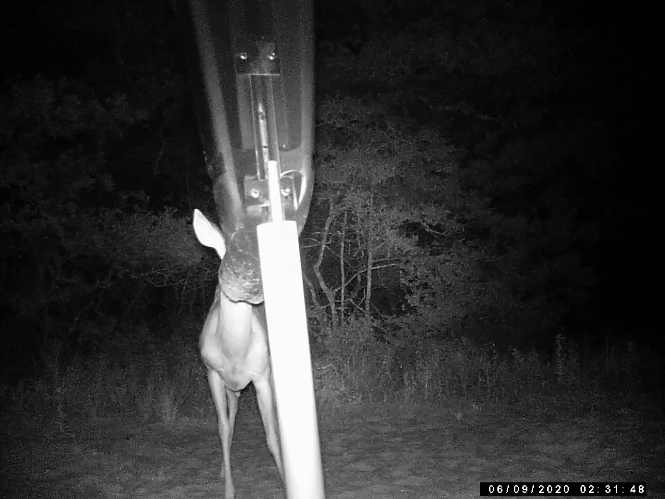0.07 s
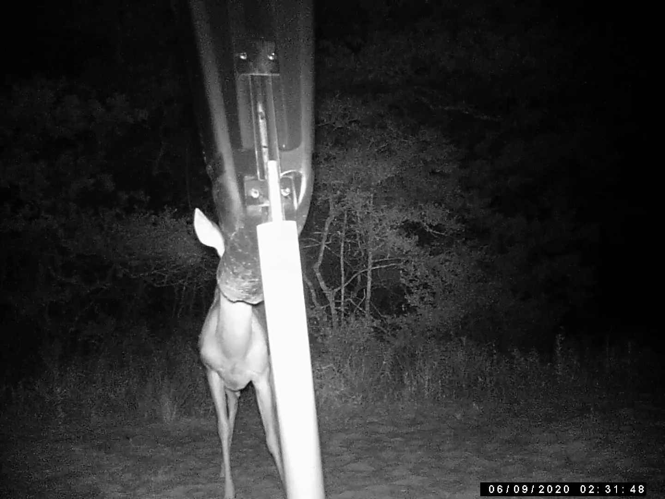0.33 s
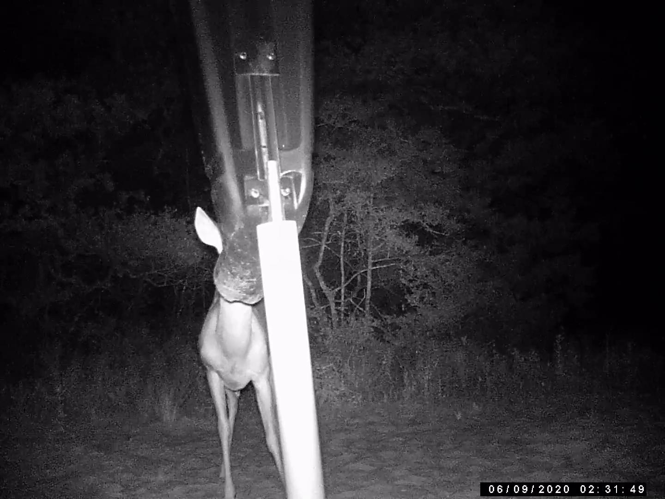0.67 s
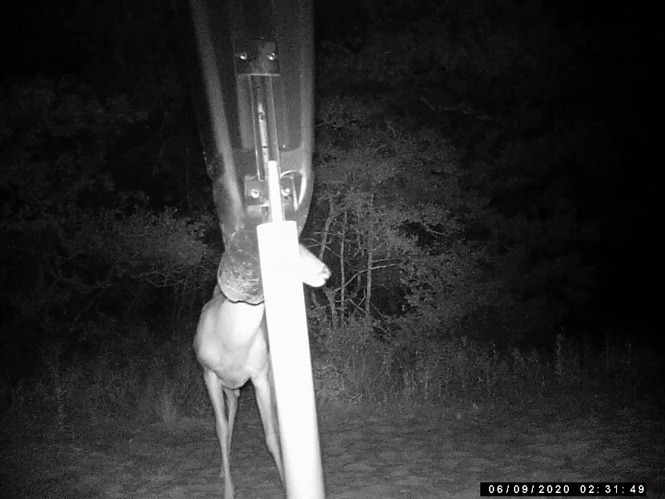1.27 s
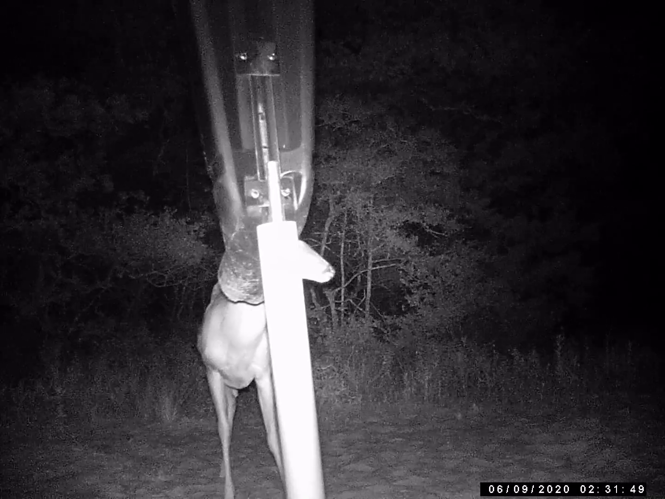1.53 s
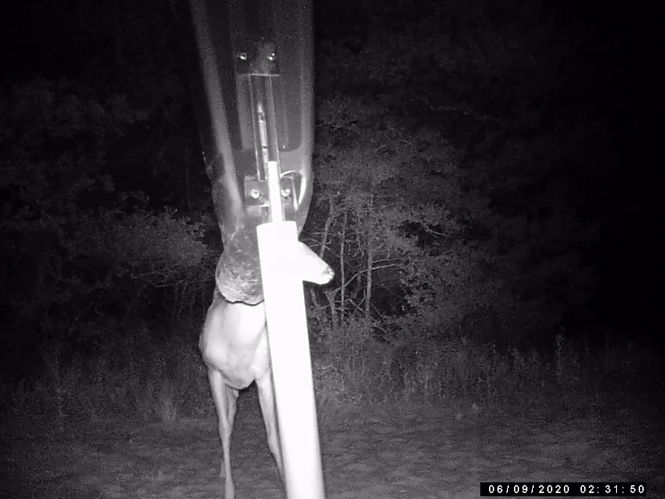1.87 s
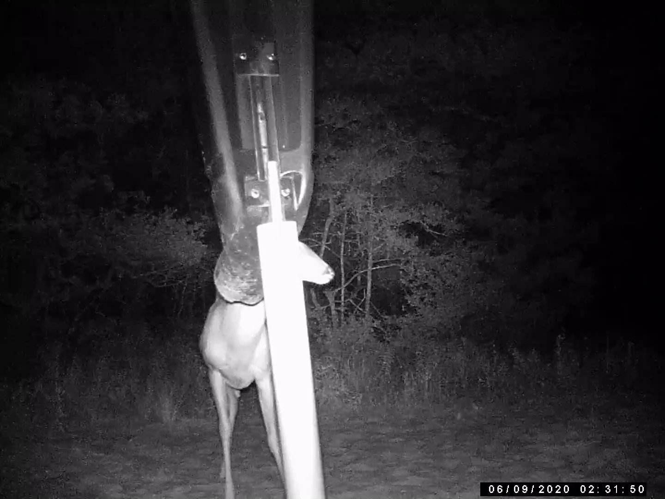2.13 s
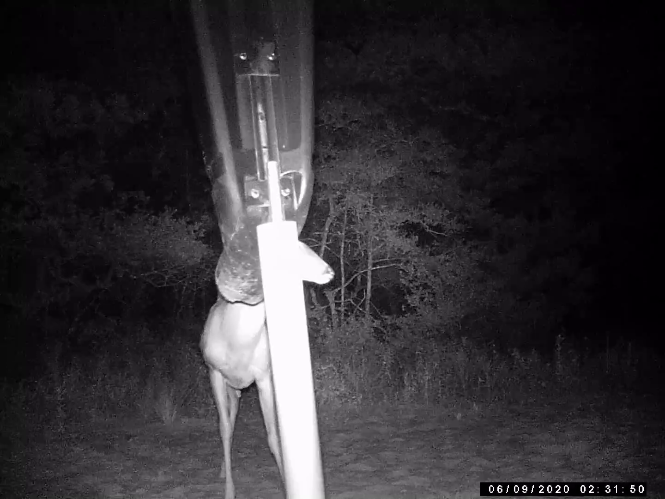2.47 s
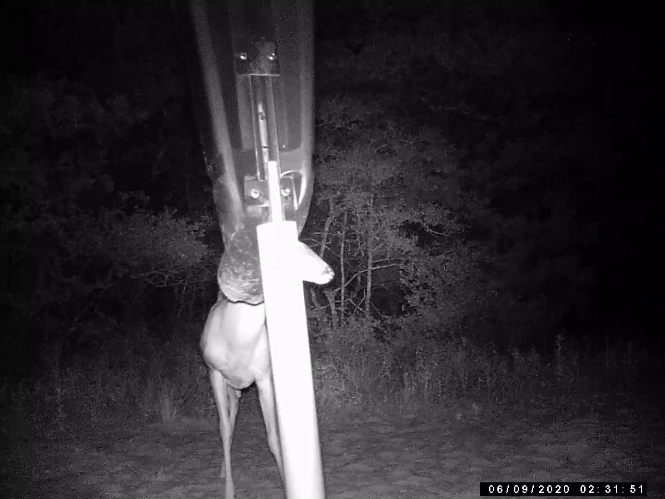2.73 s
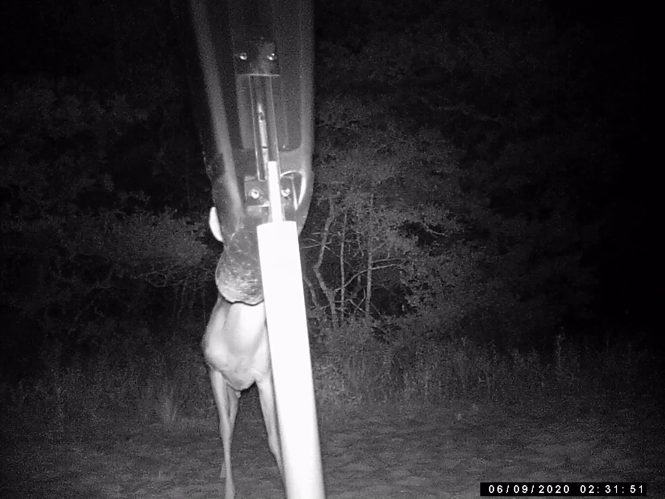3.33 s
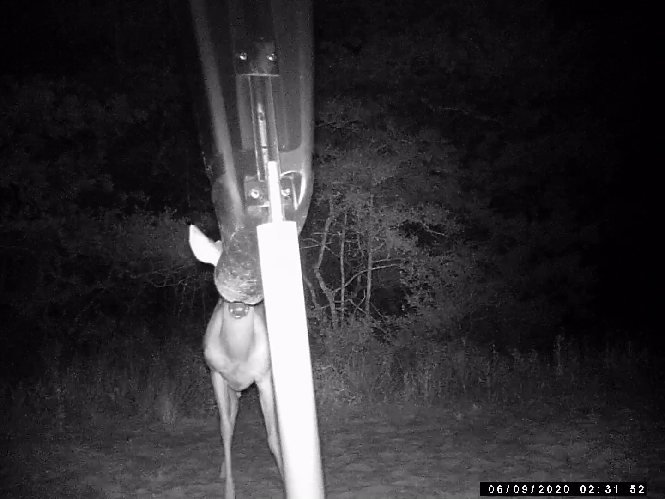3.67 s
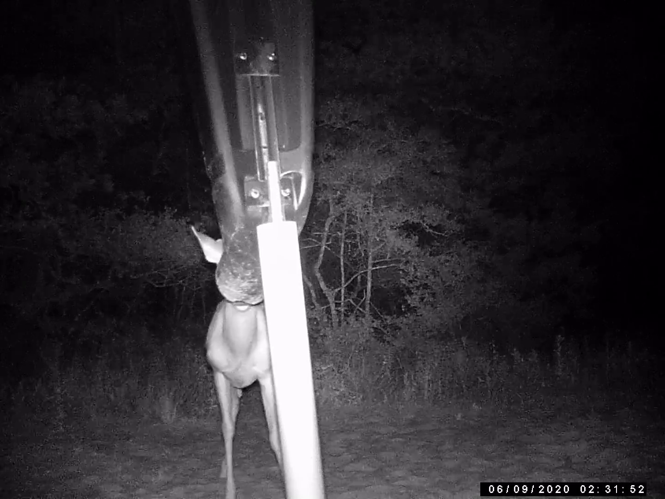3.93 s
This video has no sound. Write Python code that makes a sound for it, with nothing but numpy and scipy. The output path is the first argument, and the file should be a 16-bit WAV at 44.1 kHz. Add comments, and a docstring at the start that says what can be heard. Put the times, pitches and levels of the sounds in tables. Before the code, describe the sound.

Katydids rasp in quick pulses, alternately soft and crisp, beside dark trees full of crickets. A faraway nightjar whistles at the start and again midway, while the outdoor camera's microphone catches hum and irregular low electrical thumps throughout.

```python
"""A distant nightjar whistles its slurred phrase twice, echoed by the trees of a ranch at night.
A near and a far katydid rasp in turn, dragging a file over the wing, above a steady chorus of
crickets, one small cricket's thin chirps and still air. It is all heard by a trail camera, whose
own electronics hum, and thump and buzz each time they draw a burst of current."""
import sys
import numpy as np
from scipy import signal
from scipy.fft import rfft, irfft
from scipy.io import wavfile
from scipy.ndimage import uniform_filter1d

SR = 44100
rng = np.random.default_rng(int(sys.argv[2]) if len(sys.argv) > 2 else 0)


def unload_wav(signal):
    """Save mono or channel-first audio to the path in sys.argv[1] as 16-bit WAV at rate SR, clipped to [-1, 1]."""
    wavfile.write(
        sys.argv[1],
        SR,
        np.round(np.clip(np.atleast_2d(signal).T, -1, 1) * 32767).astype(np.int16),
    )


N = 176400


def amp(db):
    """Decibels to gain."""
    return 10 ** (np.asarray(db) / 20)


def unit_rms(x):
    """Scales to rms 1."""
    return x / np.sqrt(np.mean(x ** 2) + 1e-20)


def add(mix, start_s, sound):
    """Mixes a sound in at start_s, trimming whatever falls outside the mix."""
    at = round(start_s * SR)
    sound = sound[max(-at, 0):]
    part = mix[max(at, 0):][:len(sound)]
    part += sound[:len(part)]


def coloured(x, curve):
    """Applies an EQ curve (freq_hz, relative_db), keeping the power of white noise."""
    freq_hz, relative_db = np.transpose(curve)
    hz = np.fft.rfftfreq(N, 1 / SR)
    gain = amp(np.interp(np.log(hz + 1), np.log(freq_hz), relative_db))
    return irfft(rfft(x) * unit_rms(gain), N)


def drift(rate_hz):
    """A smooth random wander of rms 1, rolling off above rate_hz."""
    hz = np.fft.rfftfreq(N, 1 / SR)
    return unit_rms(irfft(rfft(rng.standard_normal(N)) * np.exp(-(hz / rate_hz) ** 2), N))


def harmonics(base_hz, partials):
    """Steady sines on multiples of base_hz, each with a random phase."""
    t = np.arange(N) / SR
    return sum(amp(db) * np.sin(2 * np.pi * (k * base_hz * t + rng.random())) for k, db in partials)


def woods(x, wet_db, t60_s, delay_s):
    """Adds scattered echoes from trunks and foliage."""
    t = np.arange(SR) / SR
    echoes = rng.standard_normal(SR) * (rng.random(SR) < 2000 / SR)
    tail = echoes * amp(-60 * t / t60_s) * (t > delay_s)
    return x + amp(wet_db) * signal.fftconvolve(x, tail / np.linalg.norm(tail))[:N]


def night_air():
    """Still air and microphone hiss: a soft noise bed, heaviest in the lows."""
    # colour of the bed: freq_hz, relative_db
    air_eq = [(10, 3.5), (30, -4.5), (60, -5), (110, -8.5), (170, -26), (230, -29.5), (320, -40.5),
              (500, -41), (1100, -46.5), (2000, -41.5), (4000, -37.5), (7500, -52), (9500, -56.5),
              (15500, -59)]
    return amp(-39) * coloured(rng.standard_normal(N), air_eq)


def camera_hum():
    """A low, faintly wavering hum on multiples of the camera's frame rate."""
    # hum partials: multiple, level_db
    partials = [(1, -50), (2, -40), (3, -35.5), (4, -54.5), (5, -60), (6, -56.5), (7, -70), (9, -76),
                (10, -80), (12, -82.5)]
    frame_hz = 30.14
    return np.sqrt(2) * harmonics(frame_hz, partials) * (1 + 0.059 * drift(6))


def cricket_chorus(count=16):
    """Each kind of cricket is a crowd: every one repeats a short, sagging wing pulse on its own pitch."""
    # kinds of cricket: pitch_hz, spread_hz, level_db
    kinds = [(3021, 75, -47.5), (3580, 101.4, -57.5), (4253, 166, -63), (6100, 120, -70.5),
             (7190, 120, -70.5)]
    pulse_s, pulses_per_s, sag_hz_per_s = .014, 34, 10300
    t, out = np.arange(0, pulse_s, 1 / SR), np.zeros(N)
    rank = (np.arange(count) + .5) / count
    detunes = 0.56 * np.log(rank / (1 - rank))  # most sit near the centre pitch
    for pitch_hz, spread_hz, level_db in kinds:
        crowd = np.zeros(N)
        for detune in detunes:
            cycles = np.cumsum(pitch_hz + spread_hz * detune - sag_hz_per_s * (t - pulse_s / 2)) / SR
            pulse = np.sin(np.pi * t / pulse_s) * np.sin(2 * np.pi * cycles)
            gaps = rng.uniform(.7, 1.3, size=200)
            for start_s in (np.cumsum(gaps) - 2 - rng.random()) / pulses_per_s:
                add(crowd, start_s, pulse)
        out += amp(level_db) * unit_rms(crowd)
    return out


def small_cricket():
    """Short, thin, high chirps that sag in pitch."""
    # chirps: middle_s, level_db
    chirps = [(.732, -62), (.753, -59), (.774, -63), (2.885, -54), (2.907, -62), (2.93, -63)]
    pitch_hz, sag_hz_per_s, chirp_s = 7250, 4700, 0.014
    t, out = np.arange(0, chirp_s, 1 / SR), np.zeros(N)
    cycles = np.cumsum(pitch_hz - sag_hz_per_s * (t - chirp_s / 2)) / SR
    chirp = np.sin(np.pi * t / chirp_s) * np.sin(2 * np.pi * cycles)
    for middle_s, level_db in chirps:
        add(out, middle_s - chirp_s / 2, amp(level_db) * chirp)
    return woods(out, wet_db=-22, t60_s=.15, delay_s=0.006)


def thump(rise_s, shape):
    """A smooth one-sided bump that peaks at rise_s; a higher shape narrows it."""
    u = np.arange(SR // 5) / SR / rise_s
    return (u * np.exp(1 - u)) ** shape


def camera_thumps():
    """The supply dips as each burst of current begins, buzzes while it lasts and springs back after."""
    # bursts of current: start_s, end_s, closing_thump_db
    bursts = [(0.125, 0.196, -10.5), (0.246, 0.274, -16), (0.51, 0.564, -11), (0.795, 0.851, -10),
              (1.175, 1.236, -13.5), (1.309, 1.335, -17), (1.441, 1.501, -10.5), (1.84, 1.896, -10),
              (2.119, 2.179, -10.5), (2.244, 2.271, -16), (2.51, 2.562, -11), (2.796, 2.861, -10),
              (3.176, 3.23, -10), (3.308, 3.338, -15.5), (3.442, 3.496, -12), (3.841, 3.895, -10.5),
              (1.256, 1.26, -10.5), (3.505, 3.528, -11.5)]
    # sharp ticks: start_s, level_db
    ticks = [(.843, -31), (.853, -32.5)]
    # colour of the buzz's noise: freq_hz, relative_db
    buzz_eq = [(150, -1), (400, 0.5), (550, 3), (700, 6), (900, -0.5), (1400, -2.5), (3000, 0.5),
               (6000, -17), (9000, -10), (15000, -18)]
    # pitched part of the buzz: multiple, level_db
    buzz_partials = [(2, -66.5), (3, -71), (4, -72.5), (5, -65), (6, -84), (7, -77.5), (8, -71.5)]
    buzz_hz, tick_decay_s = 201.6, 0.00054
    t, hits, gate = np.arange(N) / SR, np.zeros(N), np.zeros(N)
    for start_s, end_s, closing_thump_db in bursts:
        add(hits, start_s, -amp(-12) * thump(rise_s=0.011, shape=2.31))
        add(hits, end_s, amp(closing_thump_db) * thump(rise_s=0.013, shape=1.84))
        gate += (t > start_s) & (t < end_s)
    for start_s, level_db in ticks:
        add(hits, start_s, amp(level_db) * np.exp(-t[:SR // 100] / tick_decay_s))
    buzz = amp(-58.5) * coloured(rng.standard_normal(N), buzz_eq)
    buzz += harmonics(buzz_hz, buzz_partials)
    return hits - hits.mean() + uniform_filter1d(gate, size=60) * buzz


def katydid(strokes, wing_eq, teeth_hz, jitter, uneven_db, scrape, bite,
            rise_s, fall_s, lead_db, lead_s, leaves_s):
    """A file drags over the wing: light contact rings its main resonance, firm contact rasps broadly."""
    # the wing's main resonance: freq_hz, relative_db
    ring_eq = [(1500, -59), (3800, -22), (4700, -15), (5200, -29.5), (5700, -11), (6400, -15.5),
               (7500, -18), (9500, -33)]
    t = np.arange(-SR // 10, SR // 10) / SR
    lead_in = amp(lead_db) * np.exp(-((t + lead_s) / 0.01) ** 2)
    swell = np.exp(-abs(t / np.where(t < 0, rise_s, fall_s)) ** 3.74) + lead_in
    firmness = np.minimum(swell, 1) ** bite
    rasp, ring = np.zeros(N), np.zeros(N)
    for middle_s, level_db in strokes:
        add(rasp, middle_s + t[0], amp(level_db) * swell * firmness)
        add(ring, middle_s + t[0], amp(level_db) * swell * (1 - firmness))
    strike_hz = teeth_hz * (1 + jitter * drift(150) + .06 * drift(12))
    teeth_passed = np.floor(np.cumsum(strike_hz) / SR)
    strikes = np.diff(teeth_passed, prepend=0) * amp(uneven_db * drift(400))
    friction = unit_rms(unit_rms(strikes) + scrape * rng.standard_normal(N))
    song = coloured(rasp * friction, wing_eq) + coloured(ring * friction, ring_eq)
    # nearby leaves scatter the tooth strikes
    lag_s = np.arange(SR // 25) / SR
    leaves = rng.standard_normal(len(lag_s)) * np.exp(-lag_s / leaves_s)
    leaves *= amp(-1.5) / np.linalg.norm(leaves)
    leaves[0] = 1  # the direct sound
    return signal.fftconvolve(song, leaves / np.linalg.norm(leaves))[:N]


def katydid_pair():
    """Two katydids take turns: the near one crisp, the far one softer and wetter with forest echo."""
    # wing strokes: middle_s, level_db
    near_strokes = [(.897, -43.5), (.962, -40.5), (1.032, -40), (1.102, -40.5), (1.173, -41.5),
                    (1.251, -41), (1.32, -41), (1.397, -39.5), (1.474, -42), (1.547, -38.5), (1.622, -40),
                    (1.698, -39.5), (1.775, -40), (.83, -57), (3.015, -53), (3.082, -43.5), (3.147, -41),
                    (3.218, -42.5), (3.289, -40), (3.361, -40), (3.433, -40.5), (3.51, -41.5),
                    (3.584, -39.5), (3.661, -39.5), (3.738, -39.5), (3.811, -40.5), (3.889, -41.5),
                    (3.964, -39.5)]
    far_strokes = [(.018, -51), (.086, -52), (.158, -54.5), (.224, -50.5), (.297, -49.5), (.372, -50.5),
                   (.444, -50), (.516, -54.5), (.592, -51), (1.936, -57.5), (2.006, -61), (2.075, -56),
                   (2.145, -55), (2.212, -50), (2.283, -50), (2.353, -50), (2.428, -50), (2.504, -50.5),
                   (2.58, -50), (2.656, -50)]
    # wing colours: freq_hz, relative_db
    near_eq = [(1000, -49), (1650, -37), (1870, -4.5), (2100, -16.5), (2450, -5.5), (3300, -12),
               (4200, -14), (4700, -4), (5150, 2.5), (5600, -7), (5950, -12), (6350, -3.5), (6800, -18),
               (7900, -11.5), (8700, -34.5), (10500, -43), (12500, -31.5), (14000, -30.5), (15600, -42)]
    far_eq = [(1000, -25), (1900, -1.5), (2500, -1), (4000, -3.5), (5000, 0), (6100, 1.5), (6900, -6.5),
              (7500, -7.5), (8500, -16.5), (10300, -28.5), (12000, -17.5), (15500, -35)]
    near = katydid(near_strokes, near_eq, teeth_hz=484, jitter=0.11, uneven_db=0.5, scrape=0.58,
                   bite=0.56, rise_s=0.019, fall_s=.017, lead_db=-17, lead_s=0.026, leaves_s=0.0062)
    far = katydid(far_strokes, far_eq, teeth_hz=471.5, jitter=0.23, uneven_db=3, scrape=1,
                  bite=0.17, rise_s=0.025, fall_s=0.028, lead_db=-14, lead_s=.032, leaves_s=0.016)
    near = woods(near, wet_db=-9.5, t60_s=0.24, delay_s=.012)
    far = woods(far, wet_db=-3.5, t60_s=0.42, delay_s=.008)
    return near + far


def nightjar():
    """A slightly fluttering whistle slides along each note's contour and echoes off the trees."""
    # note contours: offset_s, pitch_hz, relative_db
    chuck = [(0, 2060, -35), (.012, 1780, -10), (.022, 1450, -7), (.032, 1320, -23), (.045, 1240, -36)]
    first_slur = [(0, 1193, -31), (.03, 1270, -11), (.042, 1468, -1.5), (.06, 1994, -16.5),
                  (.078, 2445, -20), (.095, 1500, -14), (.108, 1270, -17), (.12, 1272, -13),
                  (.134, 1506, 1), (.143, 1855, -8), (.152, 1850, -9.5), (.184, 1510, -2), (.213, 1514, -1),
                  (.25, 1362, -10), (.268, 1300, -28)]
    second_slur = [(0, 1164, -22), (.025, 1332, -3), (.04, 1507, 2), (.06, 1855, -13.5), (.08, 2442, -23),
                   (.09, 2304, -12), (.1, 1512, -3.5), (.11, 1365, -2.5), (.121, 1565, 0), (.132, 2020, -8),
                   (.144, 1771, -6), (.158, 1304, -2.5), (.19, 1192, -13.5), (.235, 1056, -17.5)]
    # cues for each note: start_s, gain_db, ramp_db (change by the note's end)
    chuck_cues = [(1.865, -41, 1)]
    first_cues = [(-.038, -37.5, -1.8), (2.104, -39, 2.7)]
    second_cues = [(.351, -37.5, -3.5), (2.495, -39.5, 2.5)]
    pitch_waver, flutter_db, fade_s = 0.0074, 2, 0.0021
    out = np.zeros(N)
    for note, cues in ((chuck, chuck_cues), (first_slur, first_cues), (second_slur, second_cues)):
        offset_s, pitch_hz, relative_db = np.transpose(note)
        length_s = offset_s[-1]
        t = np.arange(0, length_s, 1 / SR)
        glide_hz = uniform_filter1d(np.interp(t, offset_s, pitch_hz), size=220)
        fades = np.clip(np.minimum(t, length_s - t) / fade_s, 0, 1)
        envelope = amp(np.interp(t, offset_s, relative_db)) * fades
        for start_s, gain_db, ramp_db in cues:
            cycles = np.cumsum(glide_hz * (1 + pitch_waver * drift(140)[:len(t)])) / SR
            gain = amp(gain_db + ramp_db * t / length_s + flutter_db * drift(100)[:len(t)])
            add(out, start_s, gain * envelope * np.sin(2 * np.pi * cycles))
    add(out, 0.039, amp(-18.5) * out)  # one near slapback
    return woods(out, wet_db=-11.5, t60_s=.55, delay_s=.008)


def scene():
    """Mono mix of insects, air, bird and the camera's own noise."""
    mix = katydid_pair() + night_air() + nightjar() + cricket_chorus() + small_cricket()
    return (mix + camera_hum() + camera_thumps())[None]


def record(dry):
    """The camera's band limit: a steep low-pass takes off the very top."""
    cutoff_hz = 15700
    lowpass = signal.firwin(511, cutoff_hz, window=("kaiser", 9), fs=SR)
    return signal.oaconvolve(dry, lowpass[None], "same")


dry = scene()
out = record(dry)
unload_wav(out)
```